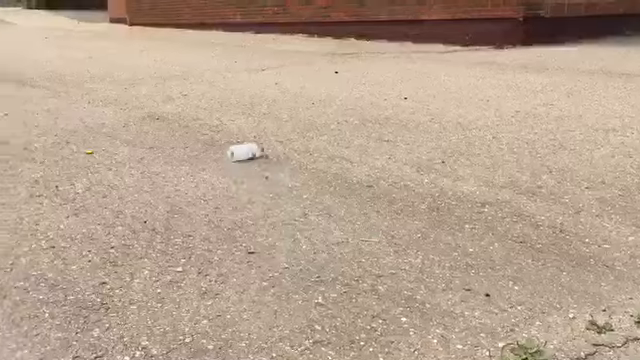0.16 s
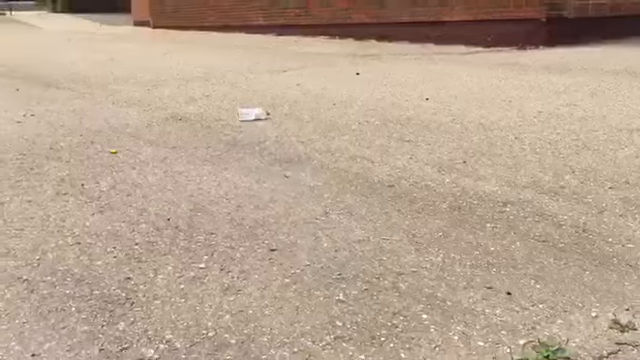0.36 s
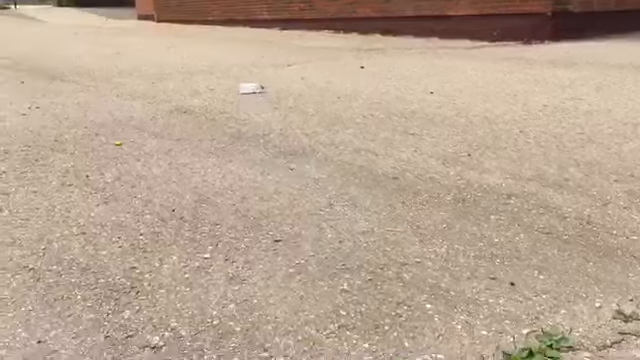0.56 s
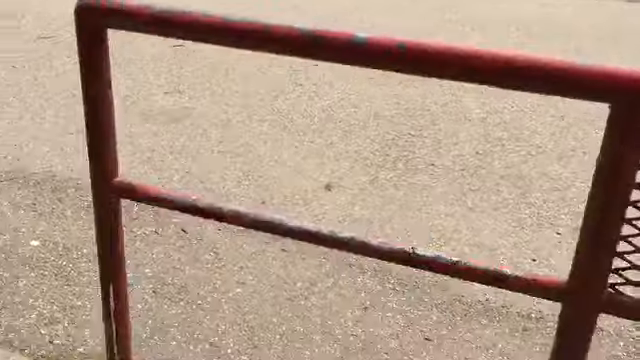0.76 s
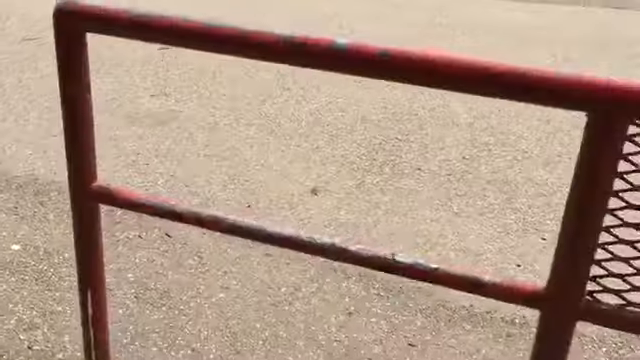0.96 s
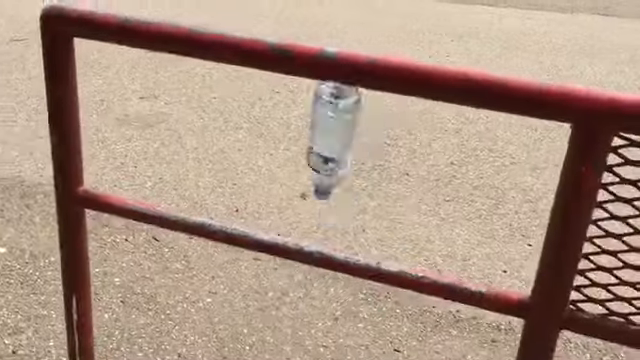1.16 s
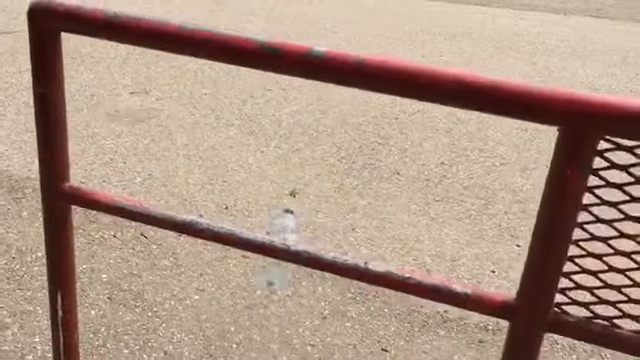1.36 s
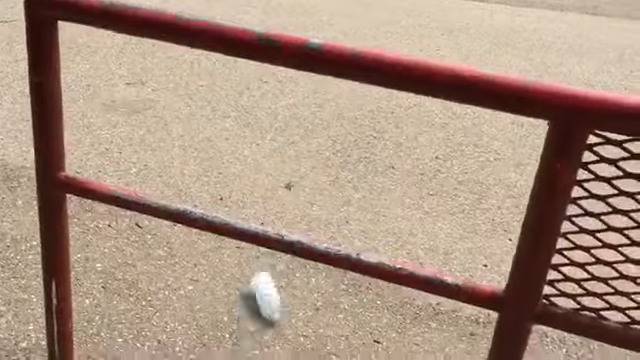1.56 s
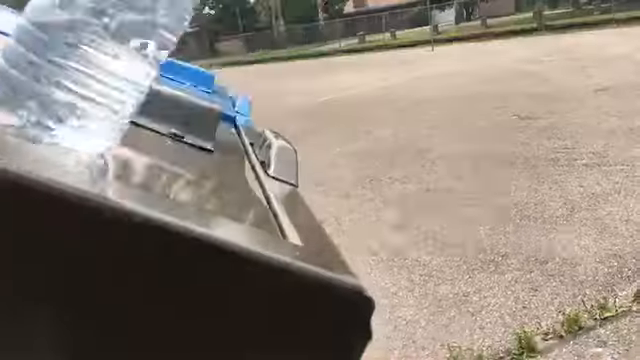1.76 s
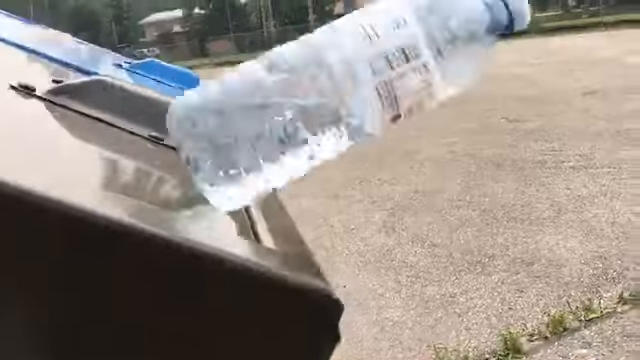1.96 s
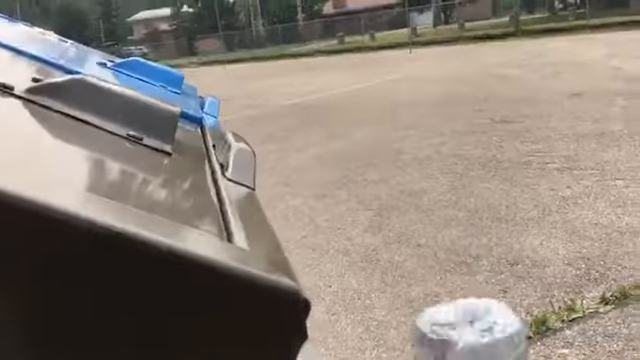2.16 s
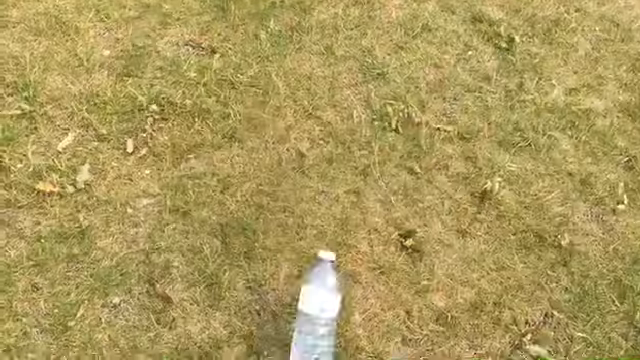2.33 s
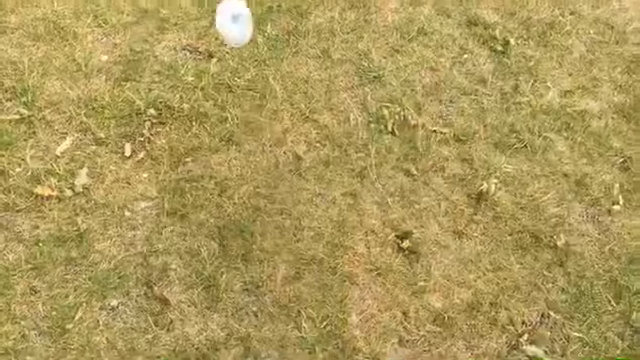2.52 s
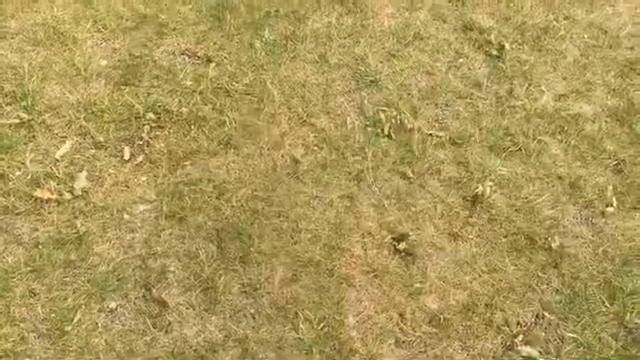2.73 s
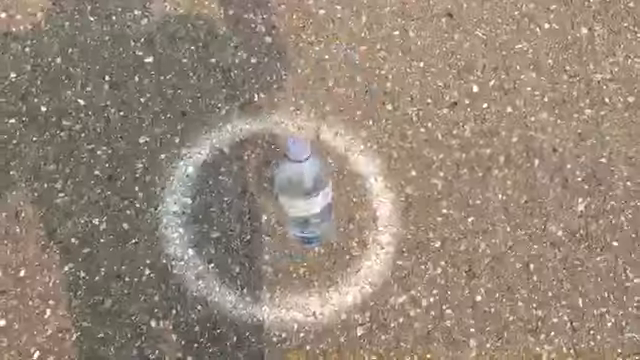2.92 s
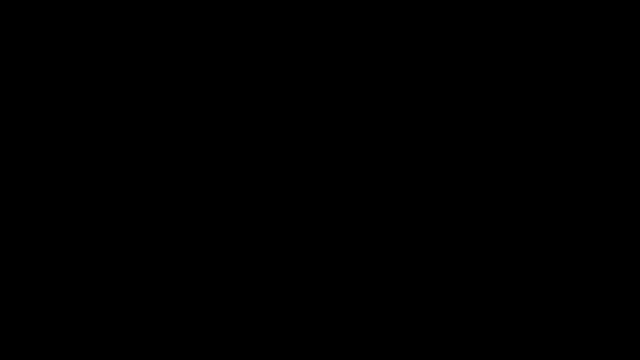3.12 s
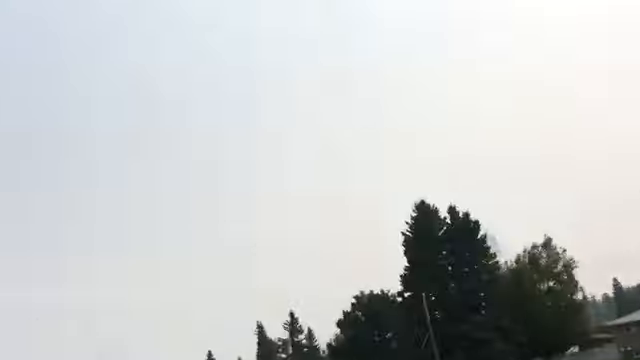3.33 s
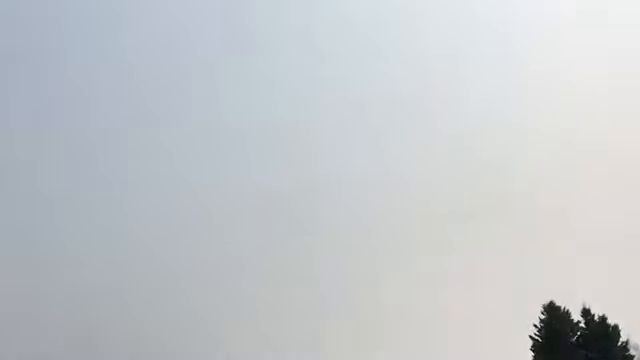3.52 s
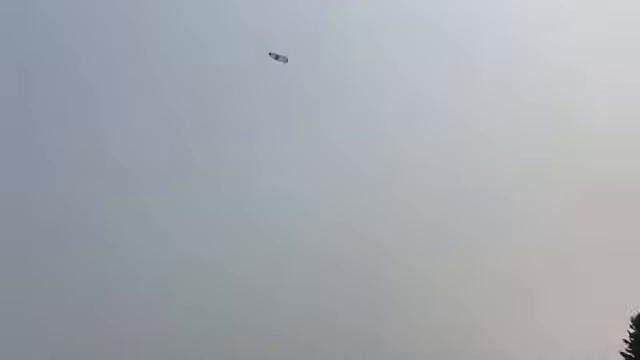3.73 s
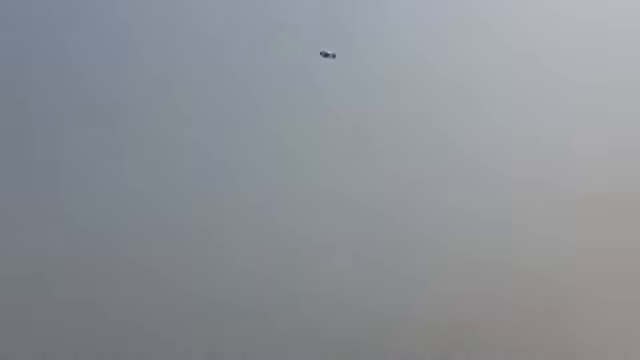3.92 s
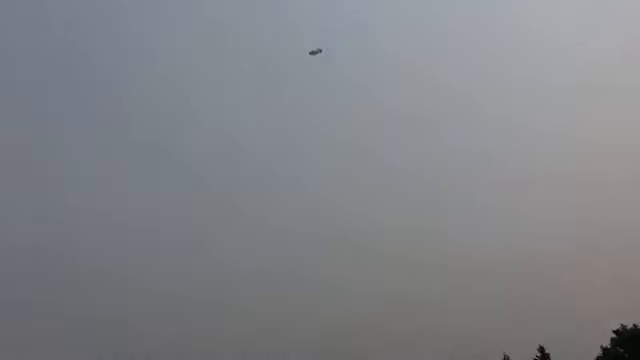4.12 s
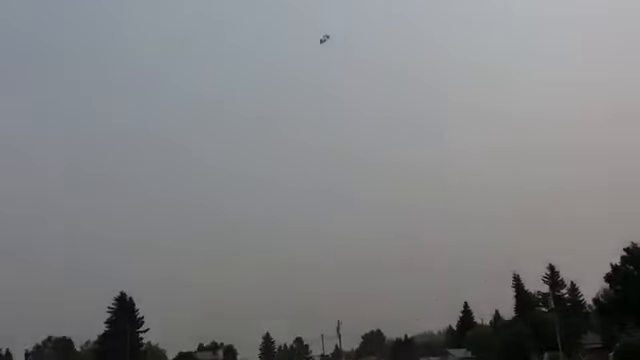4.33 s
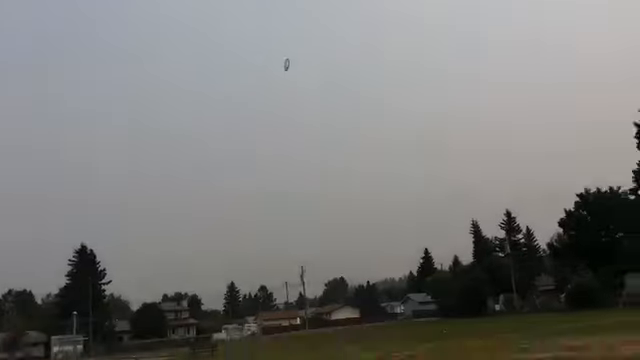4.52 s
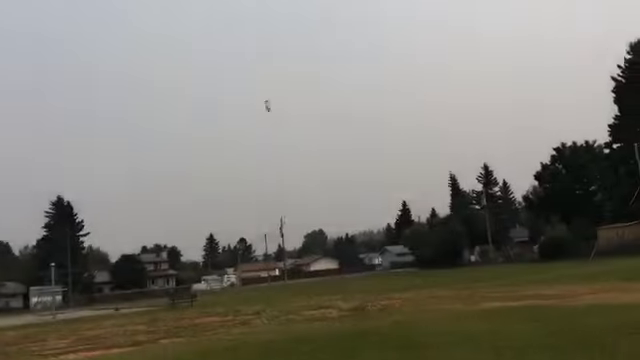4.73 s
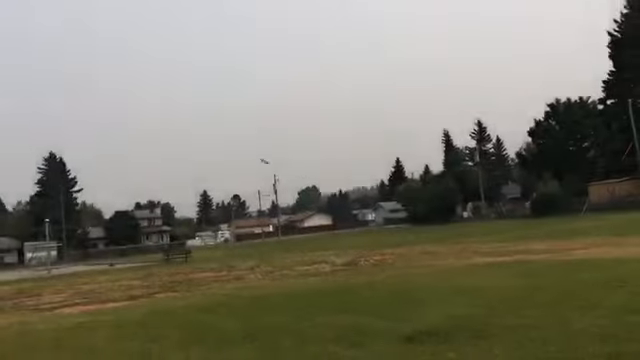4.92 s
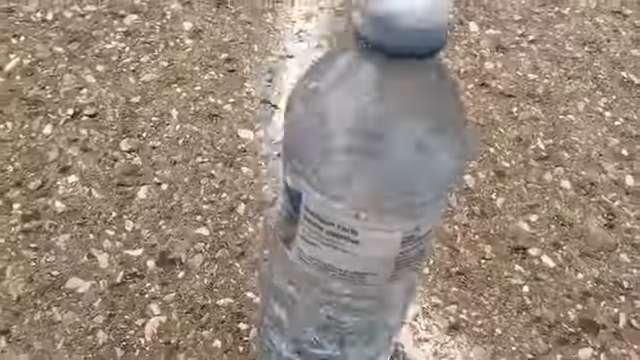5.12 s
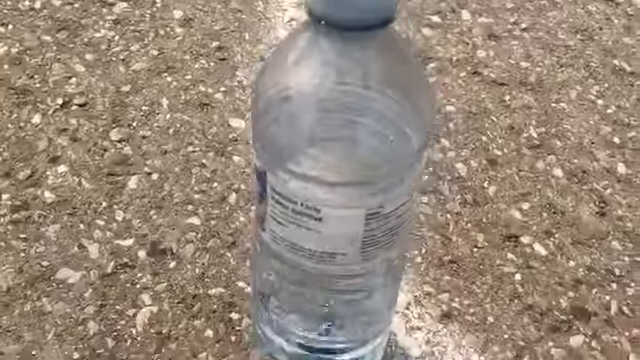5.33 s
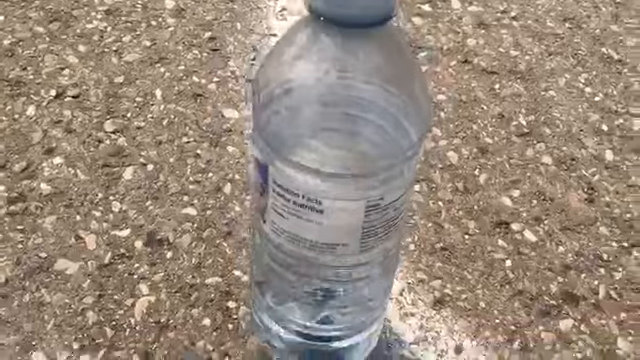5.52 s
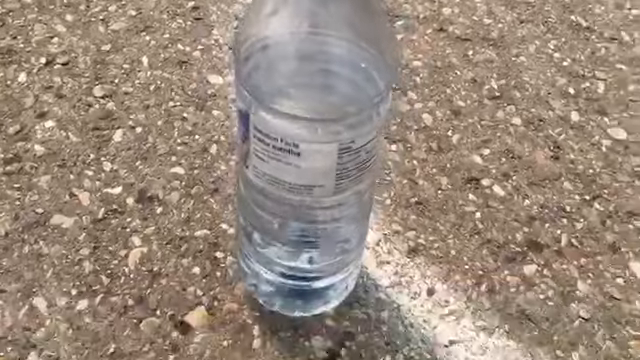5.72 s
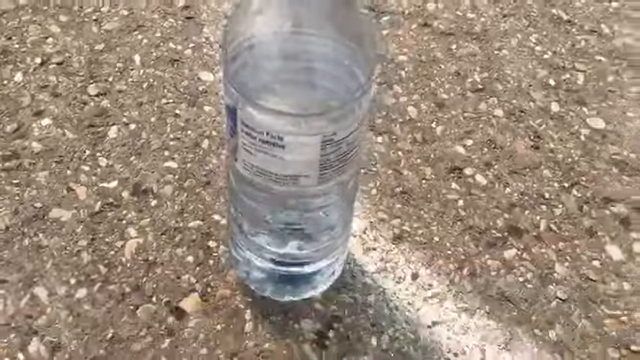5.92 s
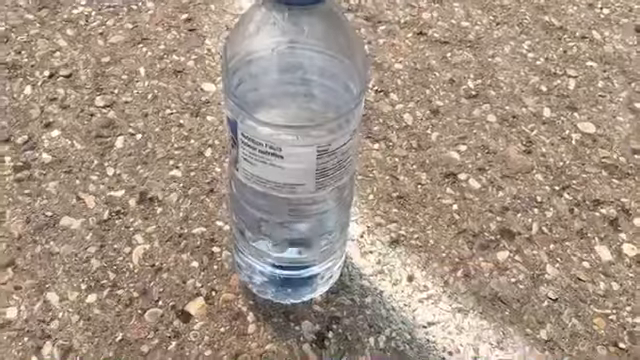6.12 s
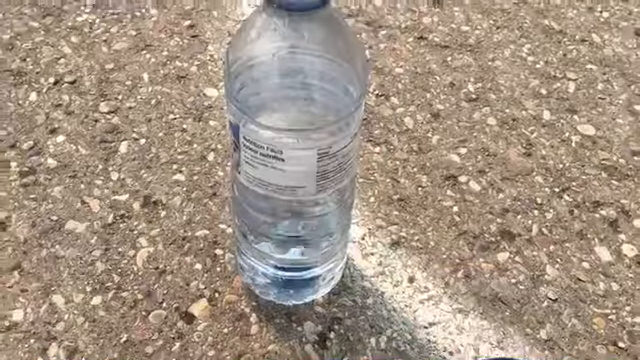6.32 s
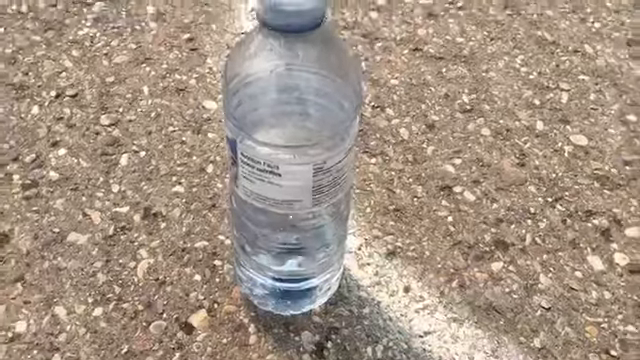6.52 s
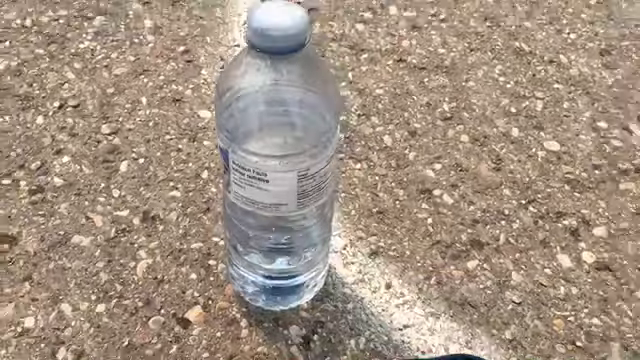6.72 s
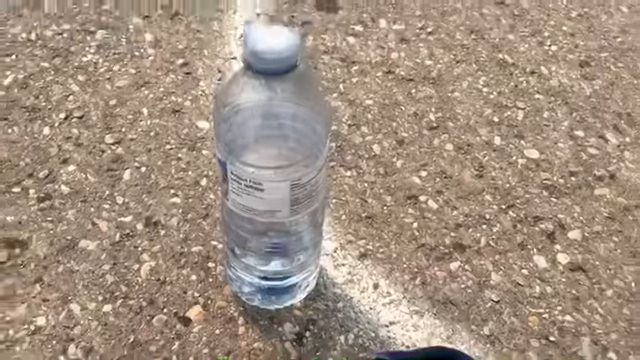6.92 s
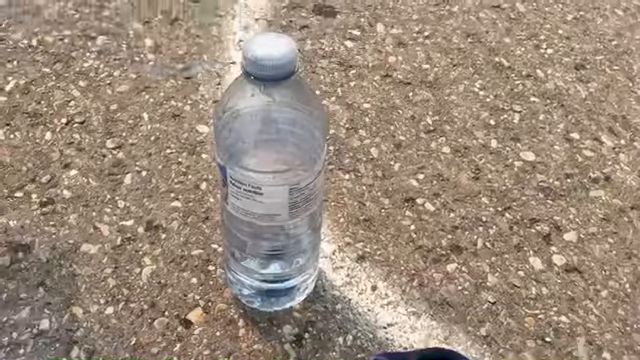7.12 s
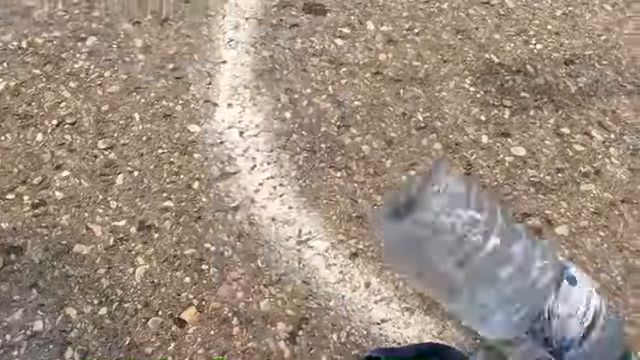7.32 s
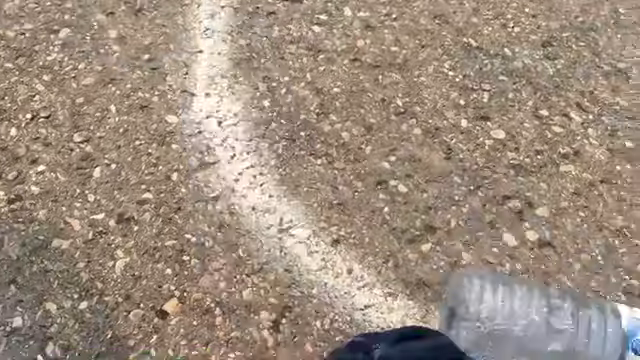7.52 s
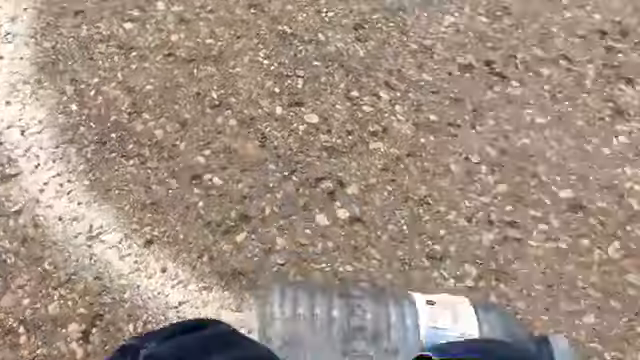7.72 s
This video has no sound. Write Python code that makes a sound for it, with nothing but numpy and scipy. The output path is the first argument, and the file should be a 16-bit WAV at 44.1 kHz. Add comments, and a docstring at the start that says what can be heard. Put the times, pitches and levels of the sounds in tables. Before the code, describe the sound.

Low town rumble, soft hiss and a faint hollow drone run throughout, changing slightly at each quick cut. From 0 to 0.8 s a thin plastic bottle skids away on asphalt in dense crackles, clicks and small knocks. At 1.0 s a soft bump, at 1.3 s a bright, sharp clip on a rail with a faint metallic ring, at 1.6 s a crunchy double knock on the ground. Soft bumps follow to 2.2 s. At 2.46 s a very loud dull thump; at 3.1 s a hard slap with a boom, then a brief near-silence. From 3.35 to 5.1 s quiet air, with tiny high metallic ticks around 3.7-3.9 s. At 5.14 s soft hollow bumps and crinkles, then near-quiet with a thin hum and small clicks. At 7.3 s a loud burst of crashes, then hollow bounces, scraping and rolling until nearly 7.9 s.

```python
"""Plastic bottle thrown about outdoors

A plastic water bottle skids over asphalt, clips a rail, drops on grass and tarmac, is handled and is knocked over,
in seven passages parted by quick fades. Contacts are noise bursts plus a resonant thump; dents add short decaying
sines; scrapes are banded noise with pitched snaps. Filtered noise gives town rumble and wind, narrow noise the
drone and booms of the bottle's air, wavering sines a faint hum and small metal parts that ring on."""
import sys
import numpy as np
from scipy.fft import rfft, irfft, next_fast_len
from scipy.io import wavfile
from scipy.ndimage import map_coordinates

SR = 44100
rng = np.random.default_rng(int(sys.argv[2]) if len(sys.argv) > 2 else 0)


def wrap_up_sound(samples):
    """Save the sound to the file named by the first command line argument, as 16-bit audio."""
    columns = np.atleast_2d(samples).T
    # keep every value between -1 and 1, then stretch to whole-number steps
    tamed = np.clip(columns, -1, 1)
    steps = np.round(tamed * 32767).astype(np.int16)
    wavfile.write(sys.argv[1], SR, steps)


N = 347066

# Near-silences that part the passages. Each row: start in seconds, end in seconds.
GAPS = [(.809, .816), (1.809, 1.809), (2.409, 2.409), (2.944, 2.946), (3.195, 3.343), (5.106, 5.11)]
# Dents that click and ring briefly, without a thump. Each row: start in seconds, reference level of the ring
# in dB, ring pitch in Hz, mid level of the crunch in dB, treble level of the crunch in dB.
DENTS = [(0.1155, -26, 2350, -31, -29), (0.1902, -28, 1600, -28, -31), (0.2224, -14, 3320, -27.5, -31),
         (0.2882, -14, 1296, -54, -36), (0.3382, -20, 1400, -41, -30.5), (0.3637, -19, 1530, -35, -43),
         (0.4102, -16.5, 1910, -32, -40), (0.4434, -30, 1430, -42, -48), (0.473, -33.5, 3350, -34, -50),
         (0.4798, -26, 3000, -33, -33), (0.5346, -33, 2040, -47, -43), (0.5837, -30, 1340, -46, -42.5),
         (0.707, -26, 3880, -40, -36.5), (0.7282, -33, 2260, -53, -62), (0.756, -39, 1800, -55.5, -44),
         (0.825, -42.5, 1330, -42, -74.5), (1.2854, -5, 2260, -24, -31), (1.4327, -47.5, 2620, -57, -69),
         (1.7385, -25.5, 2080, -37.5, -42.5), (1.7532, -32, 2450, -35.5, -34),
         (1.7707, -34, 3360, -39, -60), (1.7857, -42, 2050, -51, -68), (2.2114, -50, 1550, -52, -58),
         (2.2538, -39, 1330, -51, -44), (2.2973, -47.5, 1410, -59, -58), (2.562, -36.5, 1350, -61, -62.5),
         (2.7794, -50, 1380, -63, -64.5), (2.8583, -18, 3020, -32.5, -38), (3.4205, -45.5, 1310, -62, -57),
         (3.7292, -15, 8530, -40.5, -32), (3.7989, -37, 3370, -41, -39.5), (3.8575, -42, 1350, -58.5, -56),
         (4.0154, -46.5, 1330, -64.5, -65), (4.0488, -45, 1340, -60, -61), (4.3091, -48, 1500, -65.5, -71),
         (5.229, -33, 2590, -43, -50), (5.2823, -24, 3440, -58, -58), (5.3014, -36, 3120, -47, -49),
         (5.3414, -42, 2350, -45.5, -53), (5.3694, -45, 2210, -57, -53), (5.423, -19.5, 5980, -42, -53),
         (5.9444, -51.5, 1400, -60, -57.5), (6.0381, -47.5, 2220, -59.5, -59.5),
         (6.2094, -54, 1530, -65, -66), (6.3298, -51.5, 3400, -58, -61.5), (6.5134, -49, 2410, -61, -59),
         (6.6119, -43, 2420, -61, -57), (6.8319, -30, 2330, -45, -44), (6.8523, -33, 1900, -47.5, -46),
         (6.9287, -37.5, 1320, -46.5, -47), (6.9454, -37, 1890, -47, -52), (7.1521, -50, 1310, -64, -54),
         (7.3732, -25.5, 2600, -34, -43), (7.5734, -34, 1346, -39, -35), (7.7738, -25, 1730, -35, -56)]


def amp(db):
    """Amplitude ratio of a level: 20 dB for each factor of ten."""
    return 10 ** (np.asarray(db) / 20)


def unit(x):
    """Normalisation to unit rms, so that a later gain sets the power."""
    return x / np.sqrt(np.mean(x ** 2) + 1e-20)


def filtered(x, response):
    """Linear filtering: convolution becomes a product of spectra."""
    m = next_fast_len(x.shape[-1] + 8192)
    spectrum = rfft(x, m) * response(np.fft.rfftfreq(m, 1 / SR))
    return irfft(spectrum, m)[..., :x.shape[-1]]


def wobble(rate):
    """Slow random modulation: a spline through random knots, rate of them a second."""
    knots = rng.standard_normal(int(N * rate / SR) + 4)
    return map_coordinates(knots, [np.arange(N) * rate / SR])


def band(lo_hz, hi_hz):
    """Smooth band-pass with a gain that roughly offsets the power white noise loses outside the band."""
    gain = np.sqrt(SR / 2 / (hi_hz - lo_hz))

    def response(hz):
        high_pass = (hz / lo_hz) ** 3 / np.sqrt(1 + (hz / lo_hz) ** 6)
        return gain * high_pass / np.sqrt(1 + (hz / hi_hz) ** 10)
    return response


def bumps(rows):
    """Resonant colouring: peaks or dips, given as (Hz, width in Hz, dB), whose levels add in dB."""
    return lambda hz: amp(sum(db / (1 + (2 * (hz - c) / w) ** 2) for c, w, db in rows))


def three_bands(low, mid, high):
    """Low-mid, mid and treble noise coloured by the broad resonances of the thin wall."""
    # Each row: centre in Hz, width in Hz, peak in dB over the plain bands.
    wall_peaks = [(1060, 200, 0), (1470, 250, -4), (2500, 810, 3.5), (3230, 450, 3), (6000, 1000, 3)]
    x = filtered(low, band(380, 1500))
    x = x + amp(-3.5) * filtered(mid, band(1500, 4800))
    x = x + filtered(high, band(6600, 15000))
    return filtered(x, bumps(wall_peaks))


def crackle(size, rate, spread_db):
    """Crackling noise: its strength jumps at random, as many tiny buckles of thin plastic."""
    steps = rng.standard_normal(int(size * rate / SR) + 2)
    steps = steps[(np.arange(size) * rate / SR).astype(int)]
    return unit(rng.standard_normal(size) * amp(spread_db * steps))


def narrow(hz, width_hz):
    """Narrow-band noise: two slow random envelopes on carriers in quadrature follow a moving pitch."""
    phase = 2 * np.pi * np.cumsum(hz + np.zeros(N)) / SR
    a, b = filtered(rng.standard_normal((2, N)), lambda f: 1 / (1 + (2 * f / width_hz) ** 2))
    return unit(a * np.sin(phase) + b * np.cos(phase))


def tone(hz, width_hz):
    """Frequency modulation: a sine of rms 1 whose pitch wavers at random."""
    return np.sqrt(2) * np.sin(2 * np.pi * np.cumsum(hz + width_hz * wobble(30)) / SR)


def backdrop():
    """Stationary background: the steady levels of the present passage, one value per sample."""
    # Each row: far hiss low-mid, mid and treble, then rumble, drone and upper drone, all levels in dB.
    passages = [(-55.5, -61, -76, -41, -41.5, -52), (-64.5, -77.5, -75.5, -46.5, -57.5, -67.5),
                (-54.5, -71.5, -76, -42, -49.5, -59.5), (-65.5, -70, -66.5, -44.5, -53, -63),
                (-63, -73, -78, -46.5, -48, -57), (-60, -71, -78, -49, -52, -65.5),
                (-65.5, -75.5, -72.5, -43.5, -49.5, -69.5)]
    index = np.searchsorted([end for _, end in GAPS], np.arange(N) / SR)
    return np.transpose(passages)[:, index]


def swells(rows, floor_db):
    """Addition of powers: incoherent events that rise, hold and fade add to a floor; levels in dB."""
    rise_db_per_s = 899.5
    t, power = np.arange(N) / SR, amp(2 * floor_db)  # twice the dB turns amplitude into power
    for start, hold, fade, *db in rows:
        before = np.clip(start - t, 0, None)
        after = np.clip(t - start - hold, 0, None)
        drop = rise_db_per_s * before + fade * after
        heard = drop < 50
        power[:, heard] += amp(2 * (np.array(db)[:, None] - drop[heard]))
    return 10 * np.log10(power)


def town():
    """Shaped noise for rumble and wind, narrow-band resonance for the bottle's air, a thin machine hum."""
    # Wind on the microphone. Each row: start in seconds, hold in seconds, fade in dB per second, level in dB.
    gusts = [(2.05, 0.13, 43.5, -43.5), (3.13, 0.046, 200, -40), (3.555, 0.026, 112, -33.5),
             (4.2, 0.87, 50.5, -46.5), (5.28, 0.042, 45, -39.5), (7.33, 0.025, 600, -26),
             (7.8, .1, 50, -40.5)]
    # The air in the bottle booms as it rolls or is set down. Each row: start in seconds, hold in seconds,
    # fade in dB per second, drone level in dB, upper drone level in dB.
    booms = [(0, 0.017, 75, -38, -68), (.2, 0.22, 30, -37.5, -63), (.65, 0.085, 428, -33, -63),
             (1.01, 0.022, 253.5, -37.5, -50.5), (1.31, 0.014, 298.5, -37.5, -44.5),
             (3.13, 0.017, 189, -35.5, -41), (5.145, .01, 83, -33.5, -35.5), (7.34, 0.011, 500, -30, -24),
             (7.432, 0.018, 500, -23, -26), (7.5, 0.044, 400, -25.5, -29.5), (7.62, 0.035, 196, -41, -40.5)]
    # Relative rumble spectrum. Each row: frequency in Hz, spectral level in dB.
    rumble_shape = [(15, -29), (28, -2.5), (70, -0.5), (110, -0.5), (150, -6.5), (260, -12), (400, -28),
                    (600, -58.5)]
    # Pitch of the drone. Each row: time in seconds, frequency in Hz.
    drone_pitch = [(0, 205.3), (5.1, 198.5), (5.15, 160.8), (5.45, 195.3), (7.3, 200), (7.41, 151.5),
                   (7.56, 184.8), (7.87, 199.6)]
    # Machine hum: pitch in Hz, pitch waver in Hz, mean level in dB, start in seconds, end in seconds.
    machine = (388, 3, -61.5, 5.5, 7.1)
    levels = backdrop()
    rumble_db, = swells(gusts, levels[3:4])
    drone_db, upper_db = swells(booms, levels[4:])
    t = np.arange(N) / SR

    f, db = np.transpose(rumble_shape)
    spectrum = lambda hz: amp(np.interp(np.log(hz + 1), np.log(f), db))
    rumble = unit(filtered(rng.standard_normal(N), spectrum))
    rumble = amp(rumble_db + 0.75 * wobble(8.6)) * rumble

    drone_hz = np.interp(t, *np.transpose(drone_pitch))
    drone = amp(drone_db) * narrow(drone_hz, width_hz=42)
    drone = drone + amp(upper_db) * narrow(320, width_hz=130)

    hz, waver_hz, hum_db, start, end = machine
    hum_fade = np.clip(np.minimum(t - start, end - t) / 0.3, 0, 1)
    hum = amp(hum_db + 3 * wobble(7)) * tone(hz, waver_hz) * hum_fade
    return rumble + drone + hum


def rustle():
    """Friction noise: a smooth far hiss turns gritty as plastic scrapes nearby, with pitched snaps on top."""
    # Plastic scrapes, skids or is fingered. Each row: start in seconds, hold in seconds, fade in dB per second,
    # low-mid level in dB, mid level in dB, treble level in dB.
    scrapes = [(.1, 0.063, 200, -44, -48.5, -46.5), (.26, .14, 200, -48.5, -55, -58.5),
               (.46, .31, 300, -49.5, -56, -56.5), (.97, 0.02, 419, -66.5, -61, -61.5),
               (1.31, 0.051, 603, -53.5, -53.5, -53.5), (1.6, 0.028, 167, -47, -46.5, -46.5),
               (1.72, 0.12, 300, -57, -62.5, -59), (1.85, 0.14, 88, -55, -60.5, -54.5),
               (2.43, 0.026, 173, -52, -55.5, -49), (2.9, 0.01, 303, -61.5, -56, -53.5),
               (3.12, 0.01, 202, -38.5, -53, -47.5), (3.36, 0.18, 905, -62.5, -64.5, -64),
               (3.715, 0.042, 100, -67, -67, -58.5), (3.93, 0.019, 402, -72, -71, -64.5),
               (4.05, .06, 149, -70.5, -71, -69.5), (4.19, 0.038, 200.5, -78, -74, -71),
               (5.195, 0.092, 109, -54.5, -53.5, -52.5), (5.77, 0.1, 350, -62.5, -61.5, -67),
               (6.44, 0.012, 205, -65, -56.5, -55), (6.8, 0.15, 100.5, -69.5, -70.5, -69),
               (7.23, .05, 302.5, -69, -59, -54.5), (7.3, 0.045, 250, -48, -44.5, -39),
               (7.42, 0.13, 200, -51, -60, -64), (7.55, 0.068, 148, -42.5, -53, -52.5),
               (7.74, 0.014, 72, -43, -52.5, -53.5)]
    levels_db = swells(scrapes, backdrop()[:3])
    near = np.clip((levels_db[1] + 72) / 15, .2, 1)  # the louder, the more uneven
    patches_db = 2.6 * wobble(90) + 2.2 * np.array([wobble(60), wobble(70), wobble(80)])
    gain = amp(levels_db - 2.1 * near + near * patches_db)
    hiss = three_bands(*gain * rng.standard_normal(N))

    # candidate snaps, kept more often where the scrape is near
    when, keep, pitch, size = rng.random((6000, 4)).T
    at = (when * (N - 300)).astype(int)
    hz = 1500 * 6 ** pitch
    snap_db = np.where(hz < 6000, levels_db[1, at], levels_db[2, at])
    snap_db = snap_db + 5 - 2.1 * np.log(size + 1e-3)
    strength = amp(snap_db) * (keep < .7 * near[at])
    t = np.arange(256) / SR
    ring = np.sin(2 * np.pi * hz[:, None] * t) * np.exp(-t * hz[:, None] / 3.5)
    snaps = strength[:, None] * ring
    places = at[:, None] + np.arange(len(t))
    return hiss + np.bincount(places.ravel(), snaps.ravel(), N)


def bottle():
    """Impact excitation: each contact crunches the wall, and knocks thump as a damped resonance of air and water."""
    # The bottle knocks on something; the thump pitch depends on how the water lies. Each row: start in seconds,
    # crunch length in seconds, low-mid, mid and treble levels in dB, thump peak in dB, thump pitch in Hz.
    knocks = [(0.0642, 0.019, -28.5, -36.5, -31.5, -25, 150), (0.0731, 0.017, -27.5, -38, -36.5, -39, 196),
              (0.136, 0.0059, -35, -47, -43, -46, 158), (0.1506, 0.014, -26.5, -18, -20, -26, 167),
              (0.258, 0.0059, -41.5, -31.5, -38, -41, 200), (0.277, 0.018, -38, -38, -38, -33, 206),
              (0.3065, 0.015, -37.5, -36, -40.5, -43, 203), (0.3455, 0.0053, -38, -34.5, -35, -23.5, 210),
              (0.374, 0.018, -39.5, -37, -42, -42, 220), (0.42, .006, -42, -31, -36, -46, 209),
              (0.5006, 0.01, -39.5, -39, -39.5, -32, 210), (0.662, 0.0075, -57, -43, -41, -40, 200),
              (0.998, 0.0092, -45, -46, -43, -24.5, 213), (1.288, 0.0063, -27.5, -26, -29, -24.5, 248),
              (1.298, .012, -34, -27.5, -44, -25.5, 214), (1.5792, 0.014, -27, -21.5, -24, -20, 179),
              (1.59, .01, -30, -28.5, -22, -15, 174), (1.6277, 0.0039, -31.5, -21.5, -17, -28.5, 214),
              (1.6393, 0.0051, -41, -26, -30, -33, 215), (1.73, 0.013, -44, -44, -50, -35.5, 198),
              (2.1725, 0.013, -49, -51, -50, -31, 268), (2.462, 0.0099, -15.5, -13, -11, -2, 195.5),
              (2.8832, 0.014, -43.5, -37.5, -45, -23.5, 180), (3.085, .0021, -59, -51, -39.5, -44, 177),
              (3.0973, .0026, -54.5, -60, -48, -28, 168), (3.107, 0.0095, -19, -18, -12.5, -5, 160),
              (3.158, 0.0099, -42.5, -50.5, -39, -32, 125), (5.141, 0.013, -40.5, -47, -47, -19.5, 284),
              (5.195, 0.017, -42, -47, -42.5, -22, 189), (5.255, 0.0073, -68, -45, -66, -27.5, 139),
              (6.441, .01, -51.5, -45.5, -51, -42, 181), (6.8043, 0.014, -47.5, -48, -42.5, -35, 215),
              (7.2196, 0.016, -51, -50, -49, -32, 134), (7.3016, .014, -27.5, -11.5, -10.5, -16.5, 164),
              (7.317, 0.0087, -24, -12.5, -10, -14.5, 157), (7.3307, 0.0072, -14, -12.5, -16, -0.5, 216),
              (7.4044, 0.0051, -16.5, -30, -38, -13.5, 140), (7.4488, 0.0076, -29.5, -44, -61, -13.5, 334),
              (7.4806, 0.0021, -24.5, -38, -53, -18, 179), (7.512, .004, -48, -43, -62, -19, 193),
              (7.542, 0.0036, -21.5, -21, -32, -8.5, 175), (7.563, 0.0045, -47, -47, -55, -20.5, 168),
              (7.5998, 0.0094, -25, -34.5, -40.5, -12, 196), (7.6312, 0.007, -39, -40, -42.5, -25.5, 258),
              (7.7339, 0.011, -26, -28.5, -35.5, -23.5, 188), (7.751, 0.01, -34, -37.5, -47, -21.5, 372),
              (7.8014, 0.01, -33, -38.5, -58, -30.5, 218), (7.836, 0.007, -38, -36, -44.5, -26.5, 209)]
    # Resonances: thump width in Hz before damping, then the wall mode's pitch in Hz,
    # its width in Hz before damping, and its level in dB relative to the thump mode.
    resonances = (110, 330, 90, -2)
    width_hz, wall_hz, wall_width_hz, wall_db = resonances
    crunch, thump = np.zeros((3, N + SR)), np.zeros(N + SR)
    t = np.arange(SR // 6) / SR
    mode = lambda f, c, w: 1j * f * w / (c * c - f * f + 1j * f * w)
    t60 = np.array([[.035], [.016], [.011]])  # seconds; the higher the band, the sooner it dies
    # a dent crunches for 2.5 ms, with its low-mid 14.5 dB under its mid
    dents = [(s, 0.0025, mid_db - 14.5, mid_db, treble_db) for s, _, _, mid_db, treble_db in DENTS]
    for s, length, low_db, mid_db, treble_db, *body in knocks + dents:
        attack = np.clip(t / (.0004 + .08 * length), 0, 1)
        decay_db = -4 * np.minimum(t / length, 1) - 60 * np.maximum(t - length, 0) / t60
        shape = attack * amp(decay_db)
        shape = shape + amp(-19.5 - 60 * t / 0.093)  # loose water and grit rattle on
        at = slice(round(s * SR), round(s * SR) + len(t))
        grit = shape * crackle(size=len(t), rate=1200, spread_db=4.0)
        even = np.linalg.norm(shape[1]) / np.linalg.norm(grit[1])  # the mid energy follows the shape alone
        crunch[:, at] += amp([[low_db], [mid_db], [treble_db]]) * grit * even
        if body:
            thump_db, hz = body
            lag = .7 / hz + .1 * length  # part of the thump's own cycle plus a share of the crunch
            squeeze = np.sin(np.pi * np.clip((t - lag) / 0.0027, 0, 1))
            squeeze = squeeze + 0.13 * shape[0] * rng.standard_normal(len(t))
            damp = np.clip(1 + thump_db / 32, .3, 1)  # a hard blow is held down by the ground, a soft one rings on
            response = lambda f: (mode(f, hz, width_hz * damp)
                                  + amp(wall_db) * mode(f, wall_hz, wall_width_hz * damp))
            ring = filtered(squeeze, response)
            thump[at] += amp(thump_db) * ring / np.abs(ring).max()
    return (three_bands(*crunch) + thump)[:N]


def pops():
    """Damped free vibration: each clicking dent rings at its own pitch and dies away within some cycles."""
    ring_db, ring_cycles = -11, 9  # level relative to the table; cycles to decay by a factor e
    x, t = np.zeros(N + SR), np.arange(SR // 50) / SR
    for s, db, hz, *_ in DENTS:
        envelope = np.exp(-t * hz / ring_cycles) * (1 - np.exp(-t * hz / 1.5))
        x[round(s * SR):][:len(t)] += amp(db + ring_db) * np.sin(2 * np.pi * hz * t) * envelope
    return x[:N]


def tinks():
    """Modal ringing: faint, unsteady single modes of metal die away exponentially and sag in pitch."""
    # Small metal parts ring on. Each row: start in seconds, starting pitch in Hz, mean starting level in dB,
    # 60 dB decay time in seconds.
    metal_modes = [(1.309, 5250, -57, 0.47), (3.73, 15500, -52, 0.25), (3.801, 8300, -72, .2),
                   (3.801, 12300, -72, .3), (3.81, 9500, -65, .06), (3.857, 11700, -48, 0.039),
                   (3.858, 9200, -66, .1)]
    sag = .04  # share of the starting pitch lost per second
    t, x = np.arange(N) / SR, np.zeros(N)
    for s, hz, db, t60 in metal_modes:
        level_db = db - 60 * np.abs(t - s) / t60 + 3.3 * wobble(40)
        x += (t > s) * amp(level_db) * tone(hz * (1 - sag * (t - s)), width_hz=40)
    return x


def scene():
    """Superposition of the bottle's sounds and the outdoor background."""
    return (town() + rustle() + bottle() + pops() + tinks())[None]


def record(dry):
    """Transducer response and saturation: treble dips, fades around each gap, rounded peaks, a band limit."""
    # Dips of the microphone. Each row: centre in Hz, width in Hz, depth in dB.
    treble_dips = [(4910, 550, -4), (7500, 660, -3.5), (10500, 590, -6.5)]
    t, fade = np.arange(N) / SR, np.ones(N)
    for start, end in GAPS:
        # out over 22 ms, in over 30 ms
        fade *= np.clip(np.maximum((start - t) / .022, (t - end) / .03), .002, 1)
    x = filtered(dry, bumps(treble_dips)) * fade
    x = x / (1 + np.abs(x / .86) ** 4) ** (1 / 4)  # soft limit at .86
    # the top falls in two steps: 25 dB above 15.9 kHz, 90 dB more above 16.9 kHz
    return filtered(x, lambda hz: amp(-np.clip(hz - 15900, 0, 300) / 12 - np.clip(hz - 16900, 0, 450) / 5))


dry = scene()
out = record(dry)
wrap_up_sound(out)
```